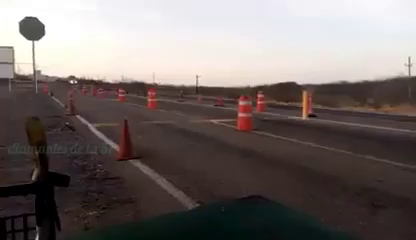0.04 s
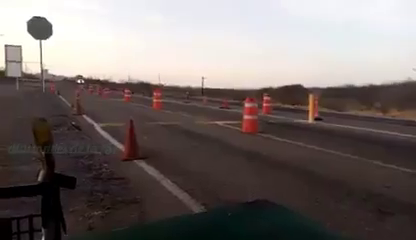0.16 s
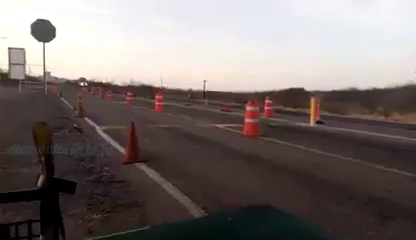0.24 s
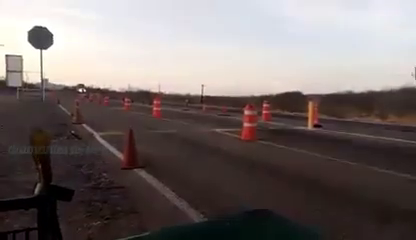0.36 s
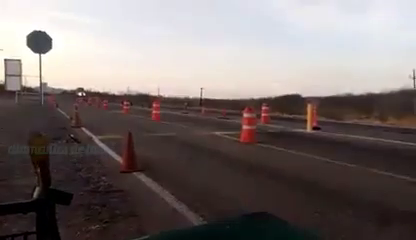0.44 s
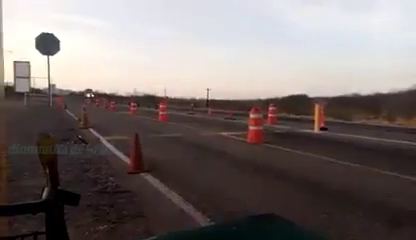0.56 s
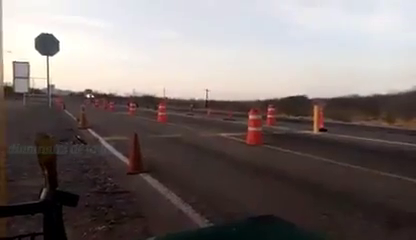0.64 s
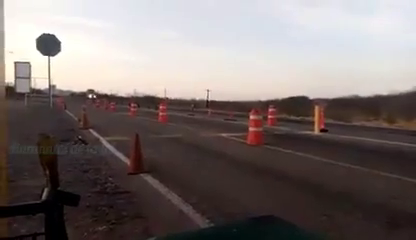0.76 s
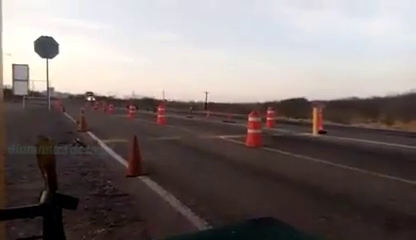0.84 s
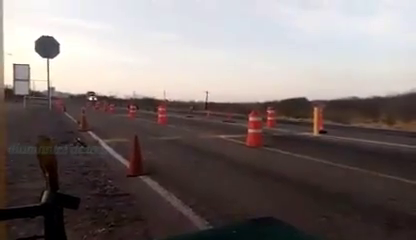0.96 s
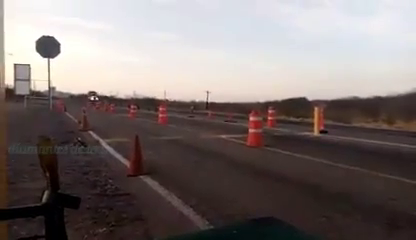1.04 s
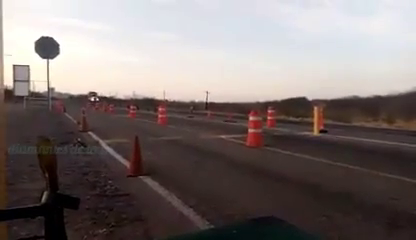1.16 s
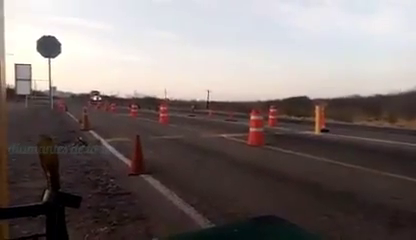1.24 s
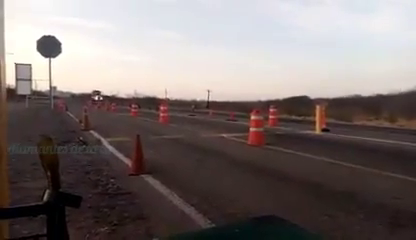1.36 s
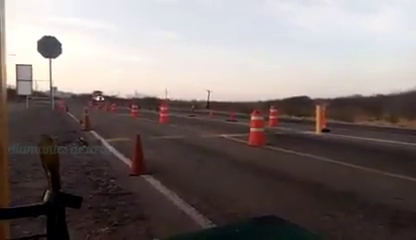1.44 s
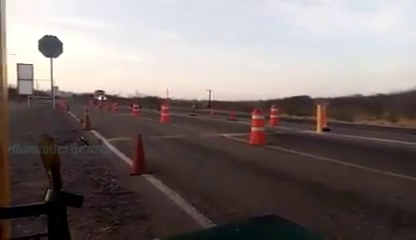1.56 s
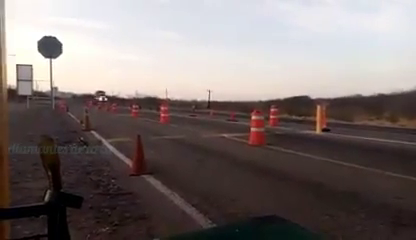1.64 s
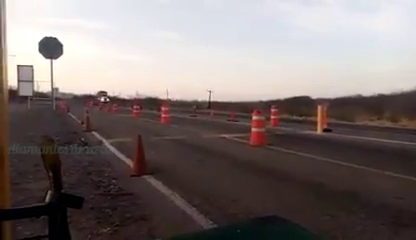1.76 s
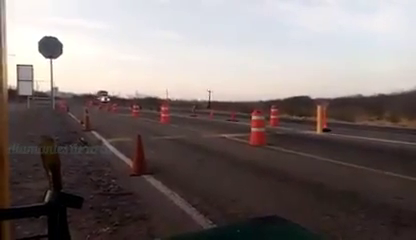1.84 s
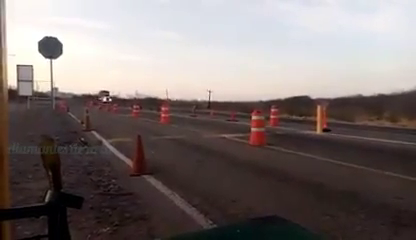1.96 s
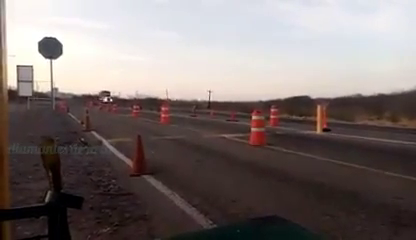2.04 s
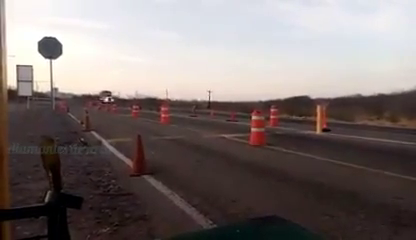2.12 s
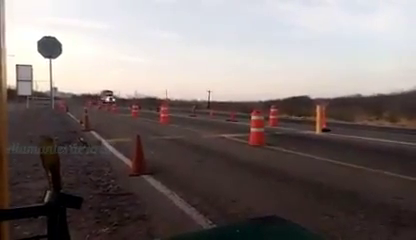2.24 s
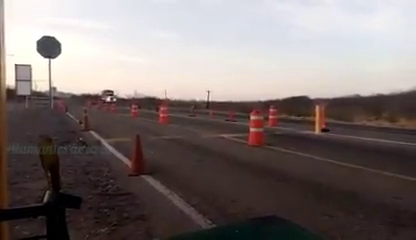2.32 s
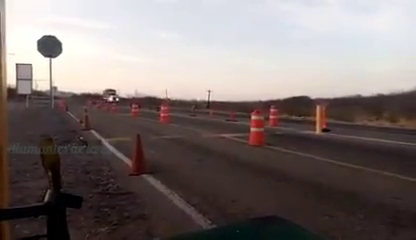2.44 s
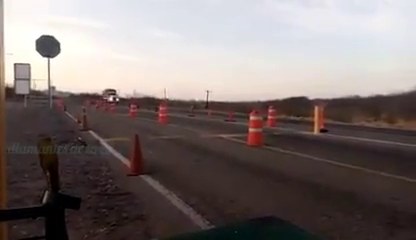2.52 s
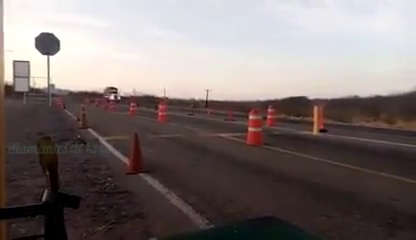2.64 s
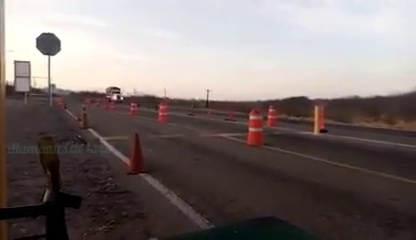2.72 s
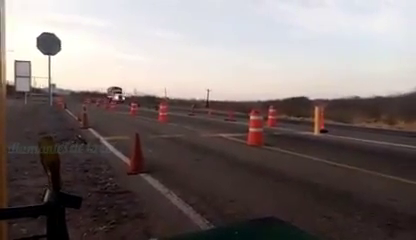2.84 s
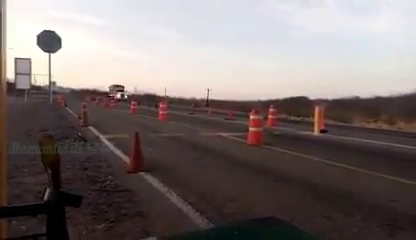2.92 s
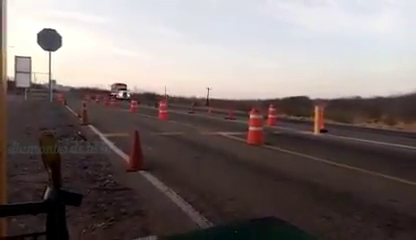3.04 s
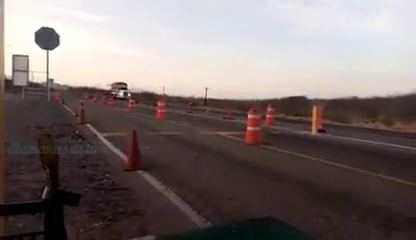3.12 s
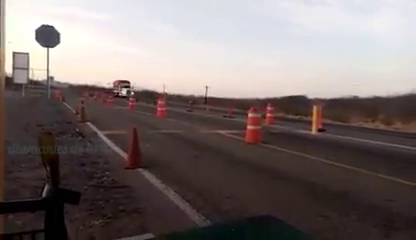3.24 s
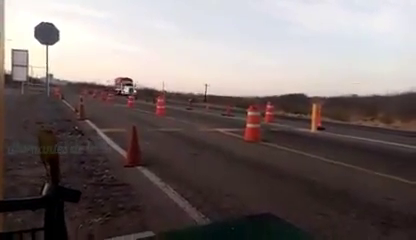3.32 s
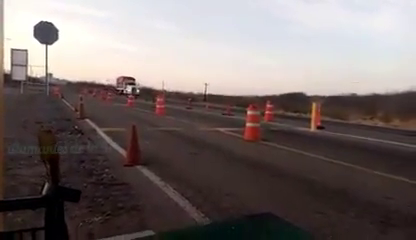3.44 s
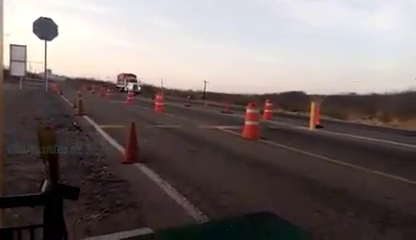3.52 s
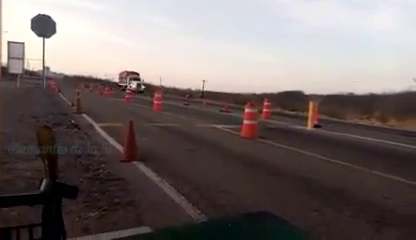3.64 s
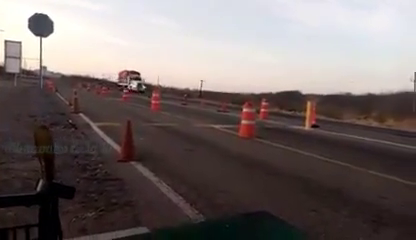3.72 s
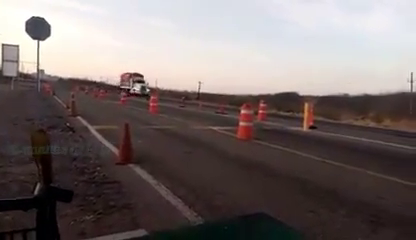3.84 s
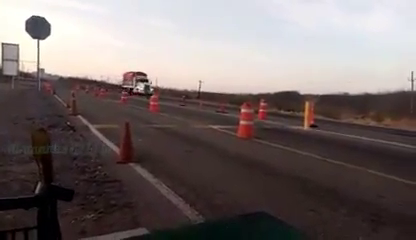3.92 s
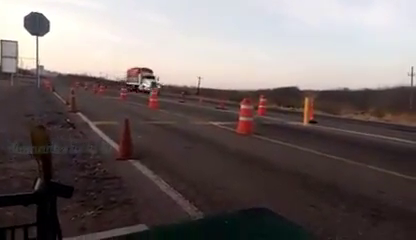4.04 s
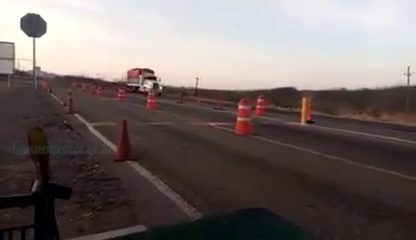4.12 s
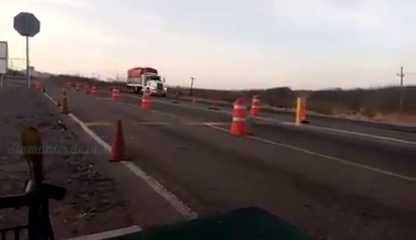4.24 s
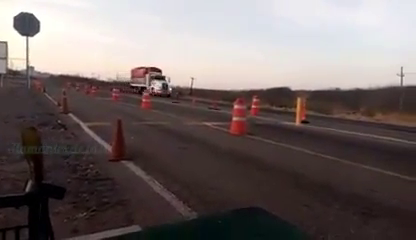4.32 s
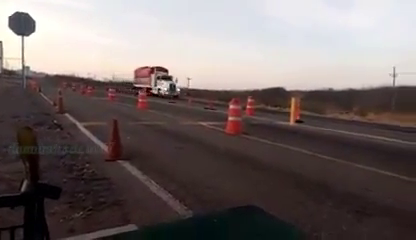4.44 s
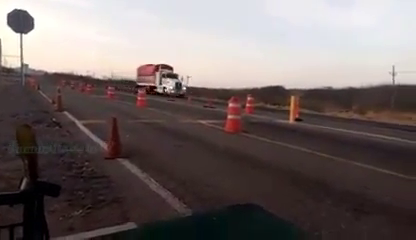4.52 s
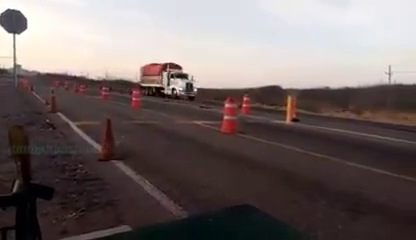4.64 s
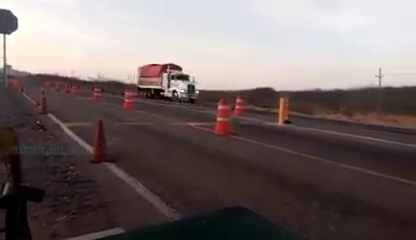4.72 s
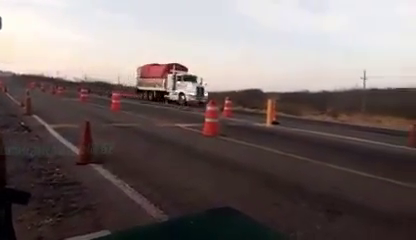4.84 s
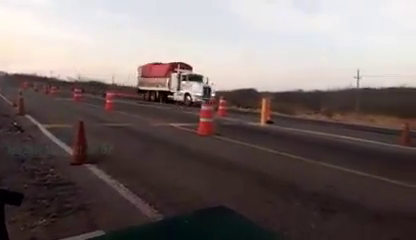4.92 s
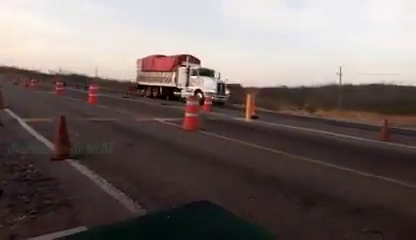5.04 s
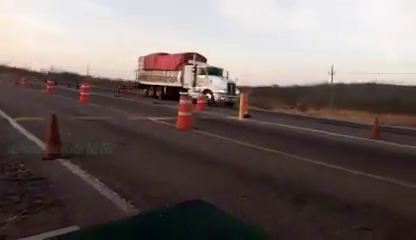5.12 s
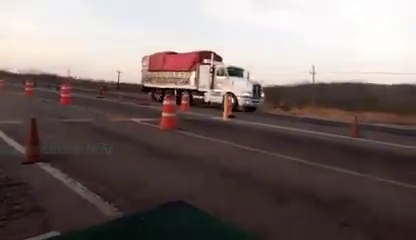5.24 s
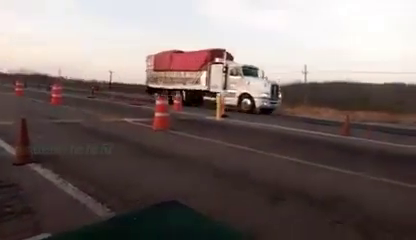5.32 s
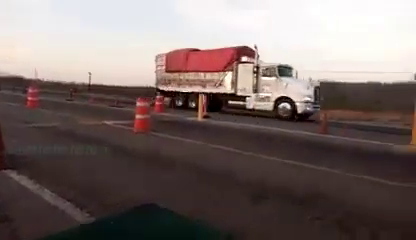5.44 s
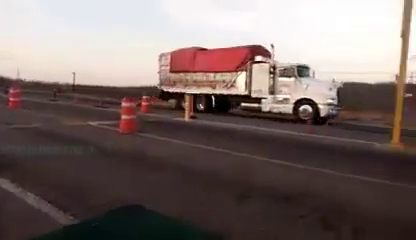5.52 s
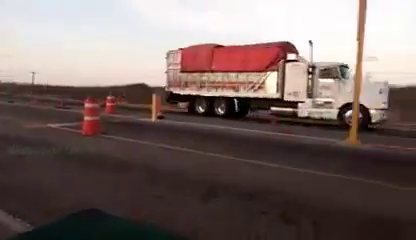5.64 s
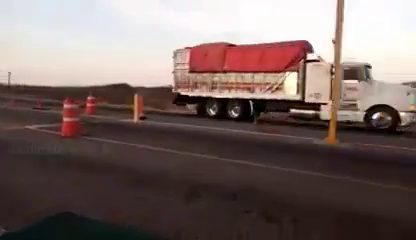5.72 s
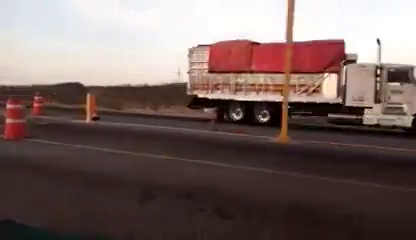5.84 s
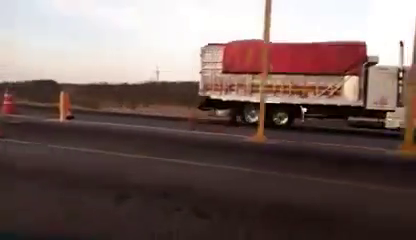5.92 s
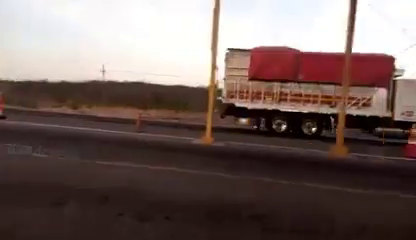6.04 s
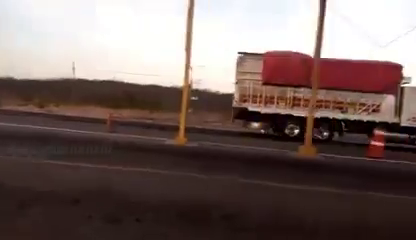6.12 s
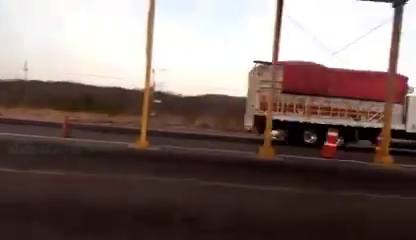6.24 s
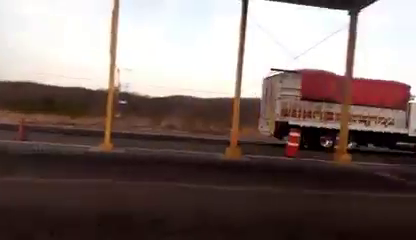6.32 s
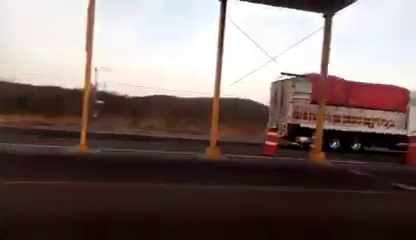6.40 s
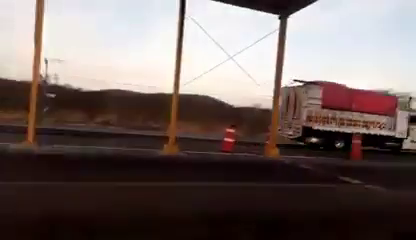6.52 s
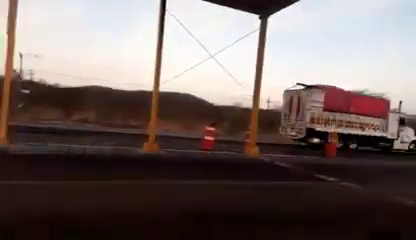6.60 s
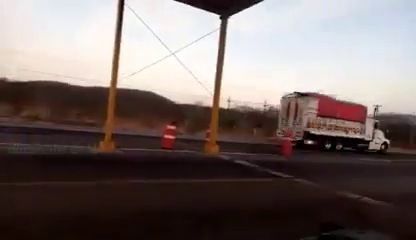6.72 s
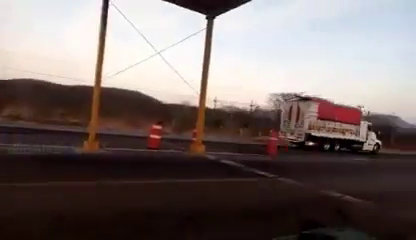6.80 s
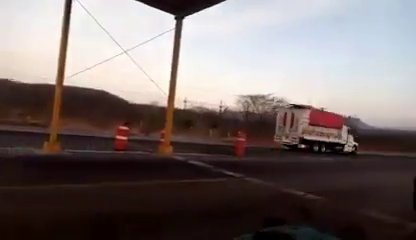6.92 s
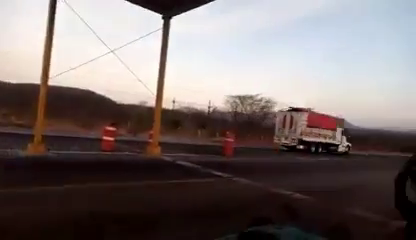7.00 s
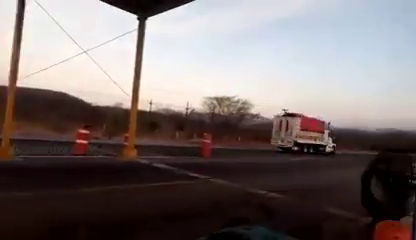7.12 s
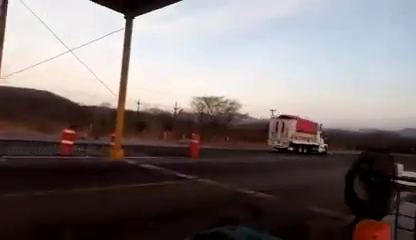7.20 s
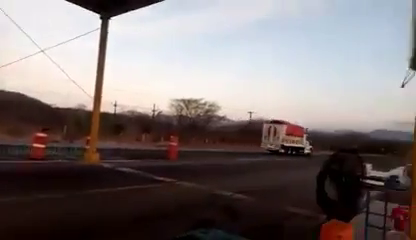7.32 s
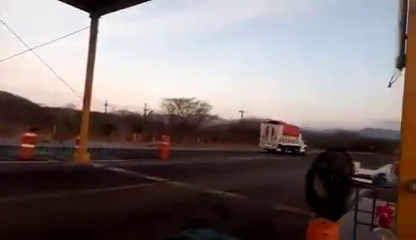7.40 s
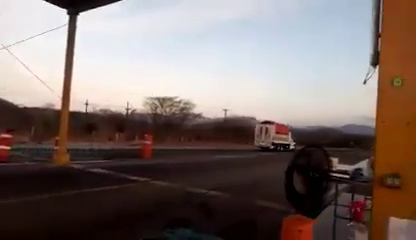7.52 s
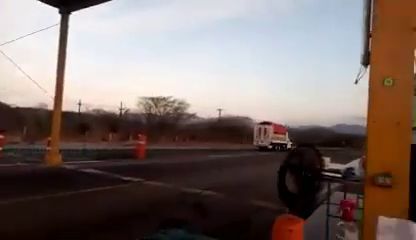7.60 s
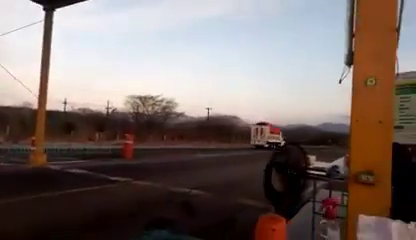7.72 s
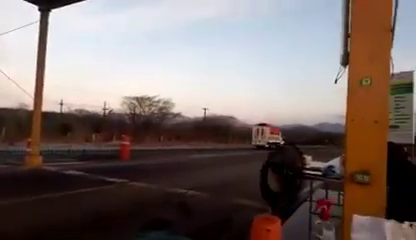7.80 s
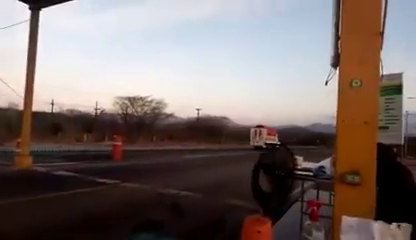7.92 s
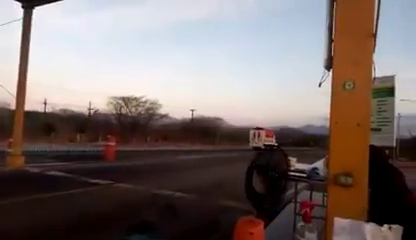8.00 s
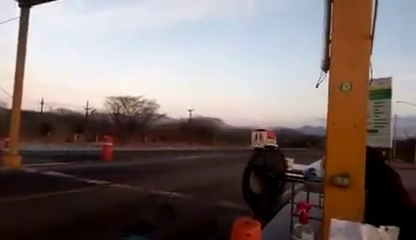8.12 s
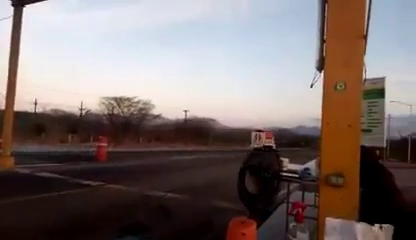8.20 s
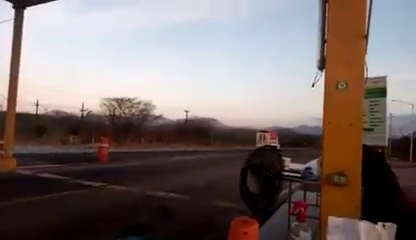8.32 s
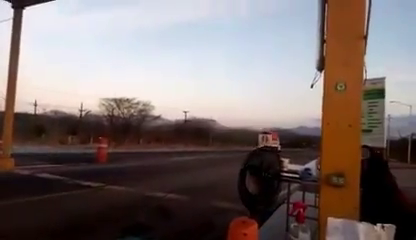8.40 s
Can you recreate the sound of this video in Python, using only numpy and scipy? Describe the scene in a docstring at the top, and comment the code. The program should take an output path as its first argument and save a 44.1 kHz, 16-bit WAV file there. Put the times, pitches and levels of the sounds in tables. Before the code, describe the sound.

Outdoors beside a road under a metal canopy, a phone hears a distant diesel truck's rapid engine-brake rattle. It stops, stutters twice and returns, swelling into loud, hard, throaty blasts. The truck sweeps by close with a pitch drop, tyre roar and trailer thuds, then barks away with echoes. Loud peaks sound squashed and slightly clipped.

```python
"""Engine-braking truck passing a canopy

A heavy diesel truck passes a roadside canopy on its engine brake, heard by a phone under the roof.
Each braking cylinder dumps its air as a shock that rings the exhaust stack and trails a jet of gas.
The brake drops out, stutters twice and returns; as the truck passes, other cylinders take the lead.
Road, roof, posts and slopes echo it, the trailer roars and thuds by, and the phone turns its gain down.
"""
import sys
import numpy as np
from scipy import signal
from scipy.fft import rfft, irfft
from scipy.io import wavfile
from scipy.ndimage import uniform_filter1d

SR = 44100
rng = np.random.default_rng(int(sys.argv[2]) if len(sys.argv) > 2 else 0)


def persist_wave(psi):
    """Save psi, clipped to +-1, as 16-bit WAV."""
    counts = np.round(np.clip(psi, -1, 1) * 32767).astype(np.int16)
    wavfile.write(sys.argv[1], SR, np.atleast_2d(counts).T)


N = 373086
TIME = np.arange(N) / SR

# the pass: speed [m/s], time [s] and distance [m] of the closest point
SPEED, PASS_S, MISS_M = 26.13, 5.9855, 14.02
SOUND_SPEED = 343  # [m/s]
REFERENCE_M = 100  # source levels hold at this distance and fall as 1 / distance
CRANK_START = -.800  # engine position at the start [four-stroke cycles]

# engine speed, nearly steady on the downgrade: (time [s], speed [four-stroke cycles/s])
ENGINE_SPEED = [(0, 14.4714), (1, 14.4934), (3.6, 14.7182), (6, 14.756), (8.46, 14.5246)]
# when each cylinder's valve opens: cylinder -> place in the cycle [share of a cycle]
VALVE_TIMING = {"A": 0, "B": .167, "C": .329, "D": .505, "E": .661, "F": .833}
# cylinders while they brake: (from [s], to [s], cylinder, thump [dB], crack [dB])
BRAKING = [(0, 2.2, "A", 1, 4.5), (0, 2.4, "D", 0.5, -2), (3.62, 5.83, "A", -2, 3),
           (3.62, 5.03, "D", -1, -1), (5.03, 5.3, "D", -0.5, 3), (5.83, 8.2, "A", 2, 6),
           (5.83, 6.05, "C", -11, -1.5), (6.05, 9, "C", 7, 1.5), (6.05, 9.8, "D", 3, -2),
           (5.83, 9.7, "E", -2.5, -3)]
# single blasts as the brake catches: (time [s], thump [dB], crack [dB])
STUTTER_BLASTS = [(2.4785, -5.5, -3.5), (2.5005, -5.5, -18), (2.5125, -4.5, -3.5), (2.5335, -1.5, -0.5),
                  (2.731, -4.5, -4), (2.7535, 1.5, -4), (2.7865, -0.5, 4), (3.5505, -4, -8),
                  (3.573, -1.5, -3.5), (3.6047, -6, 1.5)]
# blasts that bark harder or softer: (time [s], change of the crack [dB]); the thump changes half as much
BARK_ACCENTS = [(5.053, 3), (5.212, -1), (5.276, 0.5), (5.306, 4.5), (5.37, 2.5), (5.435, 5), (5.531, 5.5),
                (5.596, -2.5), (5.693, 6), (6.027, 1), (6.447, -4.5), (6.661, 2), (6.733, 4), (6.757, 0),
                (6.854, 9), (6.976, 2), (7.171, 5), (7.195, 2.5), (7.243, 1), (7.536, 4), (7.83, 1.5),
                (8.051, 4), (8.272, 2), (8.346, 0)]
# tone of the blast heard from ahead of the truck: (frequency [Hz], level [dB])
TONE_AHEAD = [(30, -18), (70, -14.5), (120, -1), (190, -1), (260, -4.5), (370, -7), (510, -12.5),
              (700, -9.5), (1500, -16.5), (2500, -31.5), (4500, -30), (8000, -40)]
# tone of the blast heard from behind the truck: (frequency [Hz], level [dB])
TONE_BEHIND = [(30, -26.5), (70, -15), (130, 1), (240, 0), (350, -11), (450, -7), (620, -7), (850, -12.5),
               (1400, -14), (2000, -14.5), (3000, -18), (4500, -27), (8000, -21.5)]
# exhaust resonances: (frequency at rest [Hz], width at rest [Hz], approaching [dB], leaving [dB])
EXHAUST_RESONANCES = [(117.8, 4.1, 0.5, -14), (164.46, 27, 0, 0.5), (240.42, 44, -17, -2),
                      (291.3, 19.3, 4.5, -10), (383, 27, 3.5, -15.5), (585.7, 14, -1.5, -21.5),
                      (1350, 160, -31.5, -20), (2640, 460, -32, -5)]
# tone of the gas jet: (frequency [Hz], level [dB])
JET_TONE = [(80, -39.5), (200, -11.5), (500, 5), (1000, -8), (1500, -2), (2000, -1), (2800, -4.5),
            (4200, -12), (6500, -11.5), (9000, -3)]
# bounce off the road, latest when the truck is nearest: (time [s], lag [ms], share [gain])
ROAD_BOUNCE = [(2.2, 0.14, .05), (3.7, 0.18, 0.072), (4.6, .5, 0.5), (5.1, 0.79, 0.53), (5.4, 1.33, 0.45),
               (5.7, 1.47, 0.6), (5.95, 2.6, 0.25), (6.2, 1.9, 0.99), (6.45, 1.63, 1), (6.75, 1.24, 0.94),
               (7.1, 0.96, 0.077), (7.6, 0.77, 0.72), (8.4, 0.57, 0.47)]
# strong echoes off the canopy:
# (lag approaching [ms], lag leaving [ms], gain approaching, gain leaving, dull above [Hz])
CANOPY_ECHOES = [(6.8, 8.8, -0.18, -0.067, 3400), (9.5, 9.5, 0.6, -0.073, 2300),
                 (9.7, 13.3, -0.036, 0.17, 660), (8, 9.2, 0.035, 0.086, 15000)]
# rasping echo off a post that faces up the road: (time [s], lag [ms], gain)
POST_RASP = [(0, 6.05, 1.64), (2.8, 5.94, 0.64), (3.6, 5.9, 0.29), (4.8, 6.7, 0.42), (5.4, 6, 0.28),
             (5.9, 4, .05)]
# throaty band where direct sound and road bounce add up: (time [s], frequency [Hz], extra gain)
THROAT_BAND = [(3.6, 2070, 0.089), (4.4, 1610, 0.19), (4.8, 1440, 0.45), (5.1, 1340, 0.54),
               (5.4, 960, 0.43), (5.7, 743, 1), (5.95, 444, 0.25), (6.3, 465, 0.32), (6.65, 660, 0.13),
               (7, 950, 0.69), (7.5, 1520, 0.29), (8.4, 2220, 0.047)]
# standing waves under the roof, in the order boom, drone, honk, ring: (frequency [Hz], width [Hz])
ROOF_MODES = [(219, 4.6), (436, 28), (537, 23), (622, 23)]
# how hard they are driven: (time [s], boom [dB], drone [dB], honk [dB], ring [dB])
ROOF_DRIVE = [(2.2, -7, -14, -27.5, -14), (3.6, -14, -26, 9, -13), (4.3, -18, -15, 11.5, -18),
              (4.6, -14, -10, -4, -19), (4.9, -4.5, -6, -1, -11), (5.3, 4, -20, -5, -25),
              (5.7, -1, -2, -10, -32), (6.1, -13, 2.5, -35, -30), (6.7, 3, -7, -12, -6),
              (7.3, -14, -24, -26.5, -18), (8.4, -15, -26, -11, -5)]
# tone of the tail from the slopes: (frequency [Hz], level [dB])
SLOPE_TONE = [(60, -26.5), (180, -1), (300, 1), (420, -2.5), (520, -5), (660, 1.5), (830, -1), (1150, -5),
              (2000, 1), (3500, 2.5), (7000, -3)]
# tone of the tyre roar: (frequency [Hz], level [dB])
TYRE_TONE = [(40, -17.5), (100, -4.5), (200, 4.5), (400, 8.5), (600, 0.5), (900, 0.5), (1800, -6.5),
             (2800, -21), (4500, -21.5), (6500, -27), (9000, -8)]
# tone of the engine and road rumble: (frequency [Hz], level [dB])
RUMBLE_TONE = [(18, -60), (30, -39.5), (90, -7.5), (147, -4.5), (186, -3.5), (264, -12), (283, -16.5),
               (570, -21), (720, -22.5), (848, -23.5), (2490, -39.5), (6040, -48.5), (8000, -50),
               (10400, -83), (17600, -120)]
# tone of the roar as the trailer's tail goes by: (frequency [Hz], level [dB])
WAKE_TONE = [(25, -22), (50, -9), (85, 0), (150, 7), (300, -20), (600, -12), (1300, -6), (2200, -21),
             (5000, -36.5), (9000, -36)]
# jolts of the trailer on uneven asphalt: (time [s], level [dB])
TRAILER_JOLTS = [(6.735, -2), (6.862, -2), (7.082, 0)]
# resonances of the trailer's body: (frequency [Hz], width [Hz], level [dB])
BODY_MODES = [(76, 34, -9), (120, 36, -6), (375, 50, -12), (460, 50, -10), (940, 150, -14)]
# tone of the phone's microphone: (frequency [Hz], level [dB])
MIC_TONE = [(20, -15), (45, -8), (80, -4.5), (4500, 1), (5800, 4.5), (6600, 6), (7300, -3), (8200, -15),
            (9200, -29), (11000, -52), (16000, -62)]
# the phone's sound fades in: (time [s], gain)
FADE_IN = [(.2, 0), (.21, 0.046), (.33, 0.3), (.5, 0.62)]


def undb(db):
    """Decibels to gain."""
    return 10 ** (np.asarray(db) / 20)


def curves(table):
    """Each column of a table, joined by straight lines in time."""
    s, *columns = np.transpose(table)
    return [np.interp(TIME, s, column) for column in columns]


def colour(x, tone, size=4096):
    """Minimum-phase filter that follows a tone table, so nothing sounds ahead of its cause."""
    hz, db = np.transpose(tone)
    log_hz = np.log(np.fft.rfftfreq(size, 1 / SR) + 1)
    log_gain = np.log(undb(np.interp(log_hz, np.log(hz), db)))
    # folding the cepstrum onto positive time gives the matching phase
    cepstrum = irfft(log_gain)
    cepstrum[1:size // 2] *= 2
    cepstrum[size // 2 + 1:] = 0
    impulse = irfft(np.exp(rfft(cepstrum)))
    return signal.oaconvolve(x, impulse)[:N]


def noise(tone):
    """Coloured noise of rms 1."""
    x = colour(rng.standard_normal(N), tone)
    return x / x.std()


def lowpass(x, hz):
    """Gentle one-pole low-pass, its corner capped at a third of the sample rate."""
    return signal.lfilter(*signal.butter(1, min(hz, SR / 3), fs=SR), x + 1e-18)


def resonate(x, hz, q):
    """One resonance with unit gain at its peak."""
    return signal.lfilter(*signal.iirpeak(hz, q, fs=SR), x)


def delay(x, lag_s):
    """The sound heard a (moving) lag later."""
    return np.interp(TIME - lag_s, TIME, x, left=0)


def walk(rate):
    """Random wander joining normal draws by straight lines, with so many draws a second."""
    return np.interp(TIME * rate, np.arange(1024), rng.standard_normal(1024))


def clock(rate):
    """A clock running at a rate: its readings and even ticks; a fixed filter run on the ticks glides."""
    turns = np.cumsum(rate) / SR
    return turns, np.linspace(0, turns[-1], N)


def truck(behind_m=0):
    """A point on the truck: how far its sound travels [m], bearing [radians from straight up the road]."""
    ahead = SPEED * (PASS_S - TIME) + behind_m
    distance = np.hypot(ahead, MISS_M) + ahead * SPEED / SOUND_SPEED
    return distance, np.arctan2(MISS_M, ahead)


def how_far_gone(bearing):
    """Slides from 0 with the truck far ahead to 1 with it far gone."""
    return (1 - np.cos(bearing)) / 2


def aimed(leaving, distance, ahead_db, behind_db, loss_db_per_m):
    """Gain of a bright sound that differs ahead and behind and is soaked up by air and ground."""
    return undb(ahead_db + (behind_db - ahead_db) * leaving - loss_db_per_m * distance)


def valves(doppler, thump_scatter_db=0.44, crack_scatter_db=1.65, jitter_s=.00007):
    """One impulse per valve opening, sized once for its thump and once for its crack."""
    turns = CRANK_START + np.cumsum(curves(ENGINE_SPEED)[0] * doppler) / SR
    cycles = np.arange(int(turns[-1]) + 1)
    blasts = list(STUTTER_BLASTS)
    for start, stop, cylinder, thump_db, crack_db in BRAKING:
        jitter, thump_scatter, crack_scatter = rng.standard_normal((len(cycles), 3)).T
        s = np.interp(cycles + VALVE_TIMING[cylinder], turns, TIME, right=np.inf) + jitter_s * jitter
        thump = thump_db + thump_scatter_db * thump_scatter
        crack = crack_db + crack_scatter_db * crack_scatter
        rows = np.transpose([s, thump, crack])
        blasts += list(rows[(s > start) & (s < stop)])
    s, thump_db, crack_db = np.transpose(blasts)
    bark_db = sum(db * (np.abs(s - at) < .01) for at, db in BARK_ACCENTS)
    place = (s * SR).astype(int)
    thumps = np.bincount(place, undb(thump_db + bark_db / 2), N)[:N]
    cracks = np.bincount(place, undb(crack_db + bark_db), N)[:N]
    return thumps, cracks


def shocks(thumps, cracks, leaving, doppler, shock_hz=800, round_hz=1800, shock_db=39, waver_db=2.0):
    """Thump sets the rounded bass and crack the steep treble; both ring the exhaust as its pitch sinks."""
    edge = cracks + lowpass(lowpass(thumps - cracks, shock_hz), round_hz)
    wave = (1 - leaving) * colour(edge, TONE_AHEAD) + leaving * colour(edge, TONE_BEHIND)
    turns, ticks = clock(doppler)  # the resonances ring in the truck's own time
    drive, behind = np.interp(ticks, turns, wave), np.interp(ticks, turns, leaving)
    ring = 0
    for hz, width, ahead_db, behind_db in EXHAUST_RESONANCES:
        gain = undb(ahead_db) + (undb(behind_db) - undb(ahead_db)) * behind
        gain = gain * undb(waver_db * walk(16))
        ring = ring + gain * resonate(drive, hz * doppler.mean(), hz / width)
    return undb(shock_db) * (wave + np.interp(turns, ticks, ring))


def gas_jet(thumps, cracks, spit_s=0.0048, spit_db=-12, rush_db=-19.5, hold_s=0.02,
            release_s=0.0066, lead_s=.005, leak_db=-6, flutter_db=3.5):
    """Air leaks as the valve lifts, spits out with the shock, then rushes on until the valve shuts."""
    spit = undb(spit_db) * signal.lfilter([1], [1, -np.exp(-1 / (spit_s * SR))], cracks)
    s = TIME[:SR // 10] - lead_s  # the leak comes before the shock
    shutting = np.exp(-np.maximum(s - hold_s, 0) / release_s)
    opening = np.where(s < 0, undb(leak_db), shutting)
    power = signal.oaconvolve(thumps * cracks, opening ** 2)[int(lead_s * SR):][:N]
    rush = undb(rush_db) * np.sqrt(np.abs(power))
    return (spit + rush) * noise(JET_TONE) * undb(flutter_db * walk(90))


def road_bounce(x, low_hz=300, dull_hz=6000, sway=0.078):
    """Shocks glance off the asphalt: a comb that sweeps down, then up, and wavers in the hot air."""
    lag_ms, share = curves(ROAD_BOUNCE)
    lag_s = lag_ms / 1000 * (1 + sway * walk(18))
    return share * lowpass(delay(x - lowpass(x, low_hz), lag_s), dull_hz)


def canopy(x, bearing, leaving, count=24, reach_s=.021, post_gain=0.19, post_low_hz=450,
           post_top_hz=4200, rasp_low_hz=1140, rasp_top_hz=2050):
    """Roof and posts echo the truck with sliding lags; the thin posts let the bass pass."""
    roof = 0
    for lag_ahead, lag_behind, gain_ahead, gain_behind, dull_hz in CANOPY_ECHOES:
        lag_s = (lag_ahead + (lag_behind - lag_ahead) * leaving) / 1000
        gain = gain_ahead + (gain_behind - gain_ahead) * leaving
        roof = roof + lowpass(gain * delay(x, lag_s), dull_hz)

    lag_ms, gain = curves(POST_RASP)
    band = signal.lfilter(*signal.butter(1, [rasp_low_hz, rasp_top_hz], "band", fs=SR), x)
    rasp = gain * delay(band, lag_ms / 1000)

    posts, along, across = 0, np.cos(bearing), np.sin(bearing)
    for k, (spot, turn) in enumerate(rng.random((count, 2))):
        far = (k + spot) / count
        facing = along * np.cos(2 * np.pi * turn) + across * np.sin(2 * np.pi * turn)
        lag_s = reach_s * (.25 + far) * (1.25 + facing)
        posts = posts + (-1) ** k * np.exp(-far) * delay(x, lag_s)
    posts = lowpass(posts - lowpass(posts, post_low_hz), post_top_hz)
    return x + roof + rasp + post_gain * posts


def throat(x, q=3.6):
    """A broad resonance that falls as the truck nears and rises as it leaves."""
    hz, gain = curves(THROAT_BAND)
    turns, ticks = clock(hz)
    drive = np.interp(ticks, turns, lowpass(x, 2 * hz.max()))
    band = resonate(drive, hz.mean(), q)
    return x + gain * np.interp(turns, ticks, band)


def roof_boom(x):
    """Standing waves between road and roof, kept ringing by the blasts."""
    modes = zip(ROOF_MODES, curves(ROOF_DRIVE))
    return sum(resonate(x * undb(db), hz, hz / width) for (hz, width), db in modes)


def hillside(x, distance, leaving, t60_s=0.57, wet_db=-8, behind_db=-8, wet_rise=0.37, drift_s=.00012):
    """A tail from scrub and slopes up the road, wetter with distance and wavering in the moving air."""
    s = TIME[:SR]
    tail = rng.standard_normal(SR) * undb(-60 * s / t60_s) * (s > .012)
    tail = tail / np.linalg.norm(tail)
    sent = x * undb(wet_db + behind_db * leaving) * (distance / REFERENCE_M) ** wet_rise
    wet = colour(signal.oaconvolve(sent, tail)[:N], SLOPE_TONE)
    return delay(wet, drift_s * walk(7))


def axles(behind_m, side_on_db=12.5, side_power=2.9, waver_db=-0.2):
    """A set of wheels roars as coloured noise, with an extra swell when side-on."""
    distance, bearing = truck(behind_m)
    roar = aimed(how_far_gone(bearing), distance, ahead_db=-14.5, behind_db=-15.5, loss_db_per_m=0.32)
    roar = roar * undb(side_on_db * np.sin(bearing) ** side_power)
    return noise(TYRE_TONE) * roar * undb(waver_db * walk(25)) * REFERENCE_M / distance


def rolling(distance, tractor_db=-6.5, tractor_ahead_m=3, trailer_behind_m=8.6, rumble_db=-23, waver_db=4.0):
    """Tractor and trailer roll by, ahead of and behind the stack, over low engine and road rumble."""
    tractor = undb(tractor_db) * axles(-tractor_ahead_m)  # tyres and engine clatter share one noise
    trailer = axles(trailer_behind_m)
    rumble = noise(RUMBLE_TONE) * undb(rumble_db + waver_db * walk(7.9)) * REFERENCE_M / distance
    return tractor + trailer + rumble


def wake(peak_s=6.85, length_s=.4, wake_db=-13, buffet_db=-1.0):
    """Rear tyres and churned air roar in a brief swell of noise after the trailer has passed."""
    swell = np.exp(-((TIME - peak_s) / length_s) ** 2)
    return noise(WAKE_TONE) * swell * undb(wake_db + buffet_db * walk(22))


def thuds(attack_s=0.0025, decay_s=.016, thud_db=2):
    """The loaded trailer jolts: a short clatter of noise that rings its body."""
    at, level_db = np.transpose(TRAILER_JOLTS)
    since = np.maximum(TIME - at[:, None], 0)
    jolts = undb(level_db) @ ((1 - np.exp(-since / attack_s)) * np.exp(-since / decay_s))
    clatter = jolts * rng.standard_normal(N)
    body = 0
    for hz, width, db in BODY_MODES:
        body = body + undb(db) * np.sqrt(SR / width) * resonate(clatter, hz, hz / width)
    return undb(thud_db) * body


def scene(blast_db=-4):
    """The truck runs along a straight road; distance and bearing set pitch, level and colour."""
    distance, bearing = truck()
    leaving = how_far_gone(bearing)
    doppler = 1 / (1 - SPEED / SOUND_SPEED * np.cos(bearing))
    spread = REFERENCE_M / distance

    thumps, cracks = valves(doppler)
    # the stack points backwards, so shocks and gas bite harder from behind
    steep = cracks * aimed(leaving, distance, ahead_db=4.05, behind_db=7.3, loss_db_per_m=0.093)
    blasts = shocks(thumps, steep, leaving, doppler) * undb(blast_db) * spread
    gas_gain = aimed(leaving, distance, ahead_db=-4.5, behind_db=5.1, loss_db_per_m=0.11)
    gas = gas_jet(thumps, cracks) * gas_gain * spread

    heard = throat(canopy(blasts + gas, bearing, leaving) + road_bounce(blasts))
    echoes = roof_boom(heard) + hillside(heard, distance, leaving)
    return (heard + echoes + rolling(distance) + wake() + thuds())[None]


def gain_control(x, threshold_db=-6.0, ratio=3.98, window_s=0.038, release_db_per_s=13.5, smooth_hz=17.0):
    """Turns the sound down quickly when it passes the threshold and lets it back up slowly."""
    power = np.abs(uniform_filter1d(x ** 2, int(window_s * SR)))
    level_db = 10 * np.log10(power + 1e-12)
    fall_db = release_db_per_s * TIME
    held_db = np.maximum.accumulate(level_db + fall_db) - fall_db  # peaks sink at the release rate
    over_db = lowpass(np.maximum(held_db - threshold_db, 0), smooth_hz)
    return x * undb(-over_db * (1 - 1 / ratio))


def record(dry, ceiling=1.53, clip_at=0.96, top_hz=15600):
    """The phone rides its gain, rounds the shocks, thins deep bass and high treble, fades in and clips."""
    rounded = ceiling * np.tanh(gain_control(dry[0]) / ceiling)
    x = colour(rounded, MIC_TONE) * curves(FADE_IN)[0]
    clipped = np.clip(x, -clip_at, clip_at)
    # a steep filter cuts everything above the top
    return signal.sosfilt(signal.ellip(8, .2, 70, top_hz, fs=SR, output="sos"), clipped)[None]


dry = scene()
out = record(dry)
persist_wave(out)
```